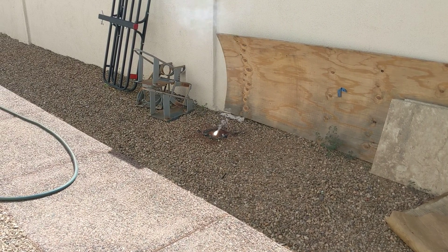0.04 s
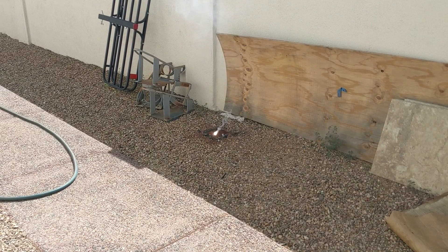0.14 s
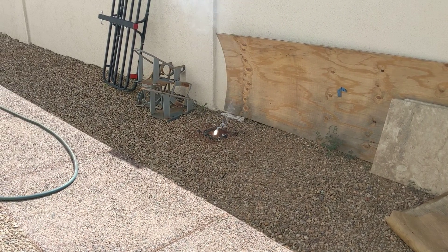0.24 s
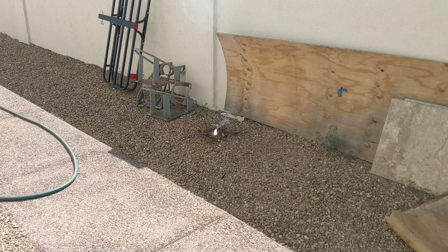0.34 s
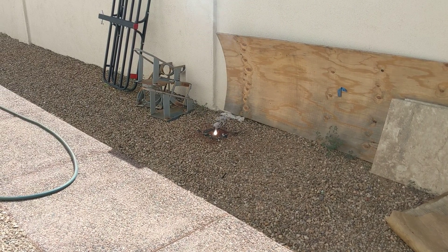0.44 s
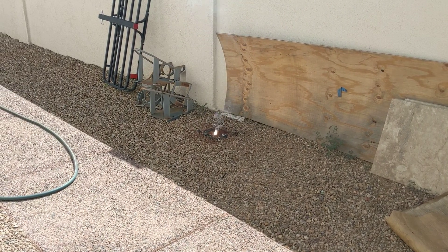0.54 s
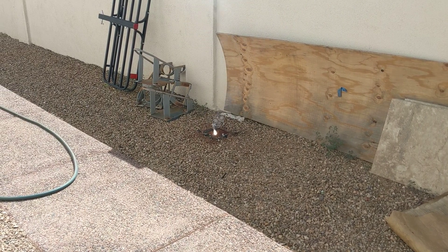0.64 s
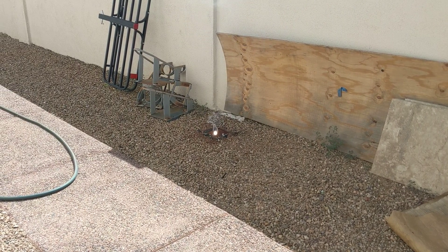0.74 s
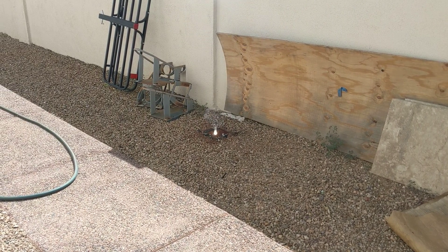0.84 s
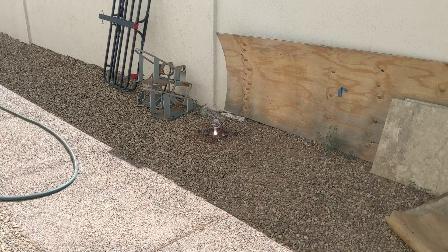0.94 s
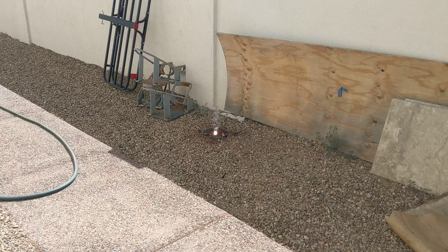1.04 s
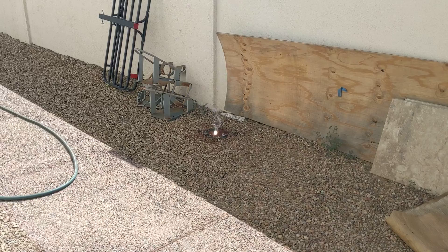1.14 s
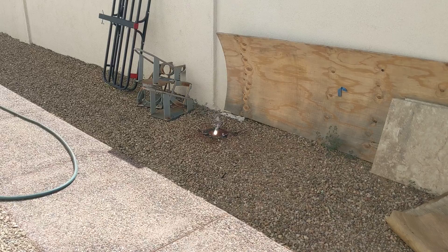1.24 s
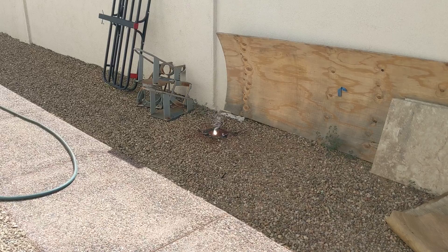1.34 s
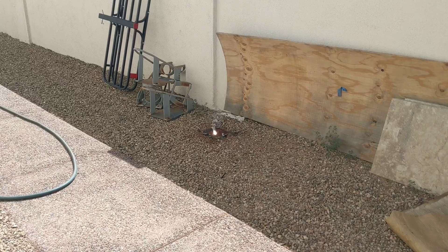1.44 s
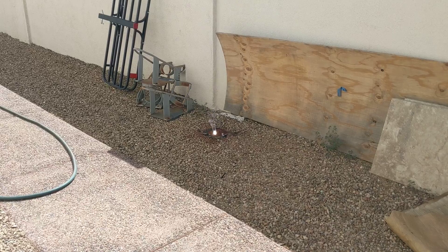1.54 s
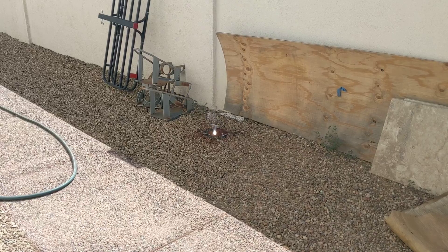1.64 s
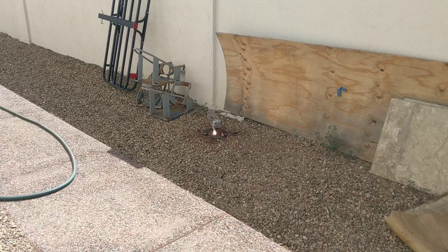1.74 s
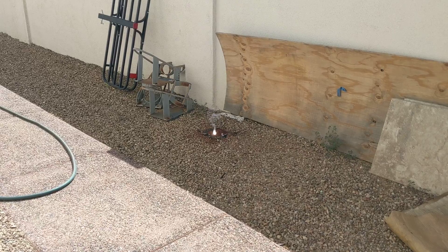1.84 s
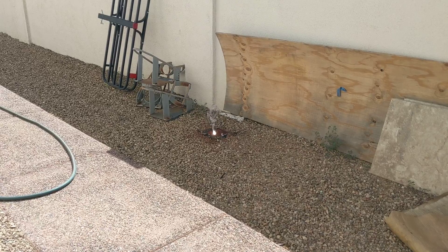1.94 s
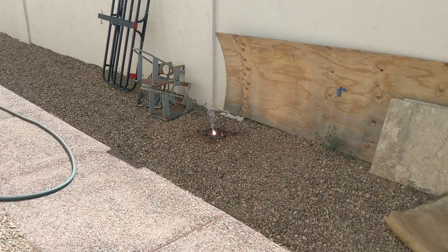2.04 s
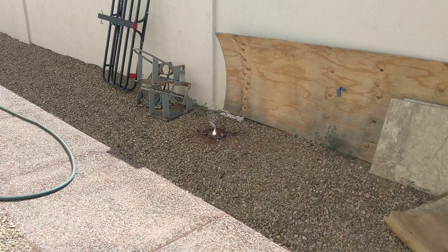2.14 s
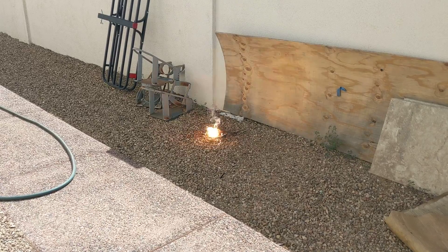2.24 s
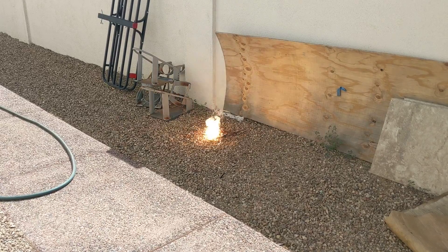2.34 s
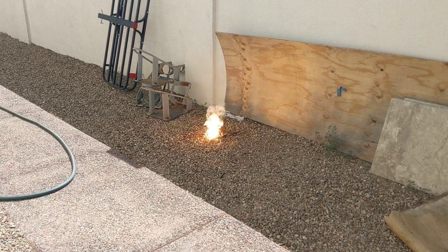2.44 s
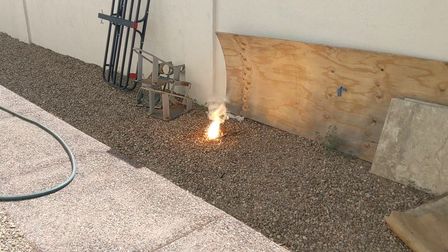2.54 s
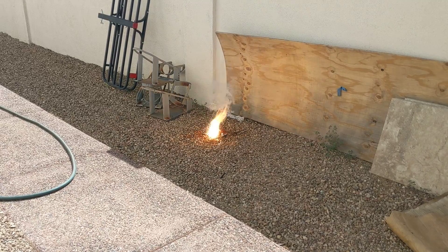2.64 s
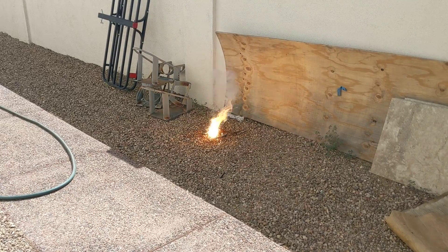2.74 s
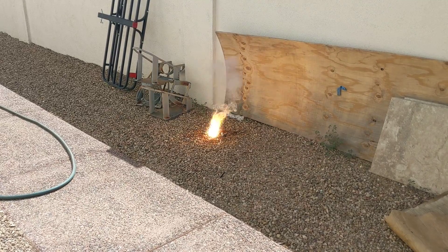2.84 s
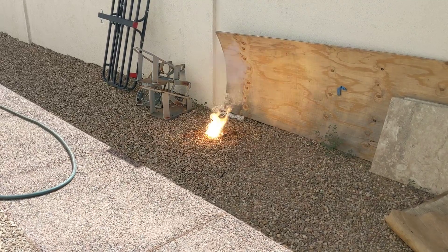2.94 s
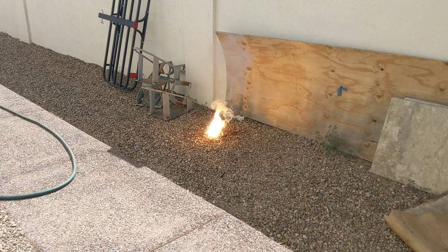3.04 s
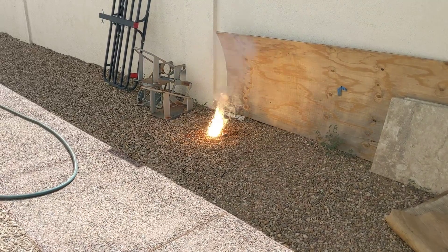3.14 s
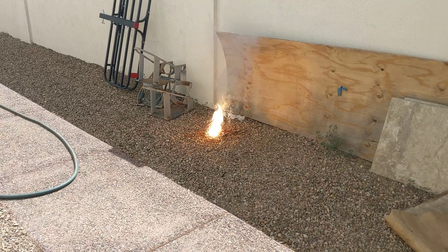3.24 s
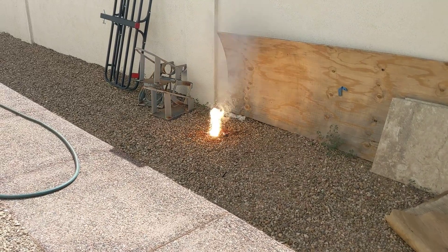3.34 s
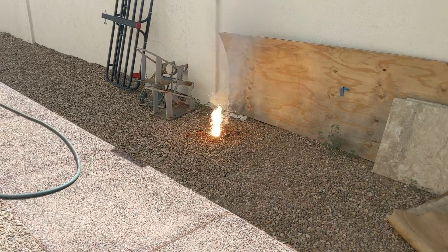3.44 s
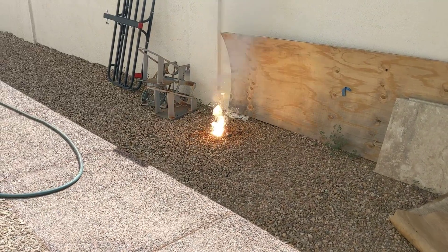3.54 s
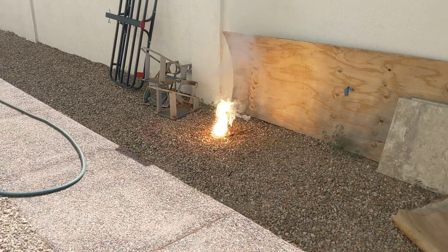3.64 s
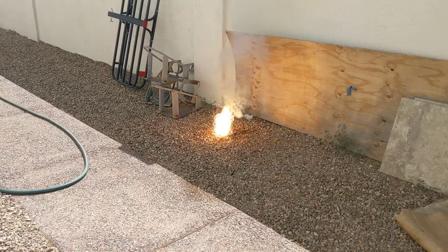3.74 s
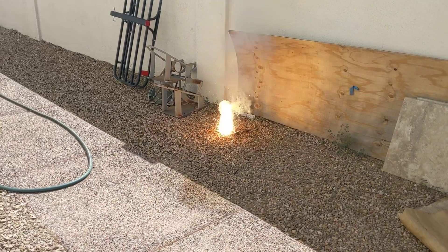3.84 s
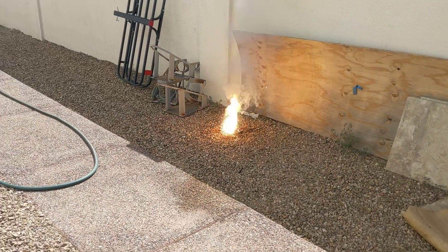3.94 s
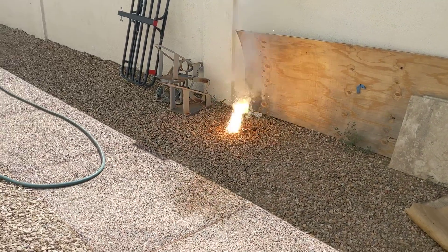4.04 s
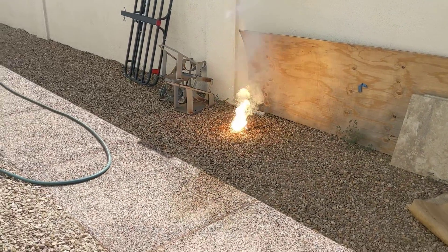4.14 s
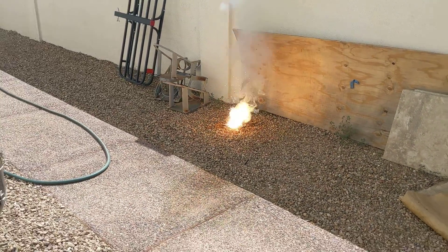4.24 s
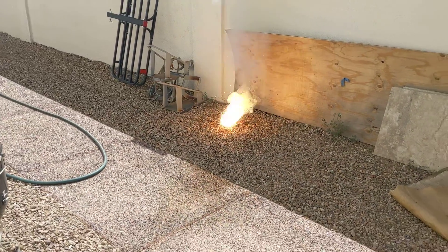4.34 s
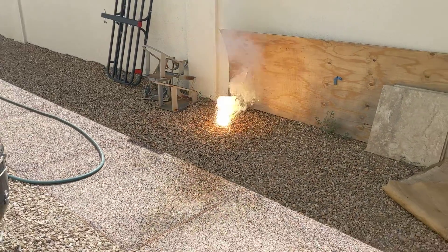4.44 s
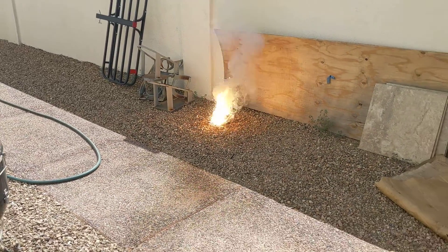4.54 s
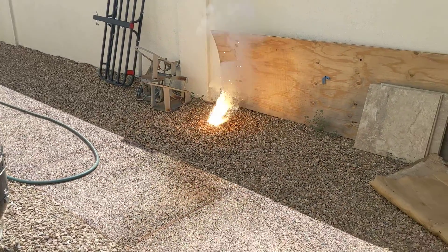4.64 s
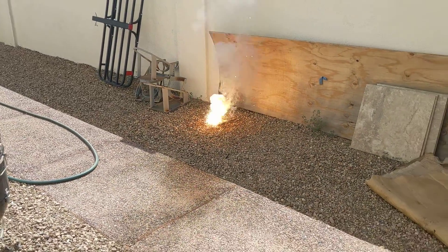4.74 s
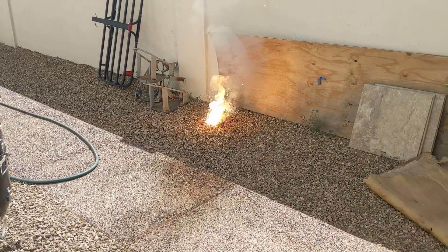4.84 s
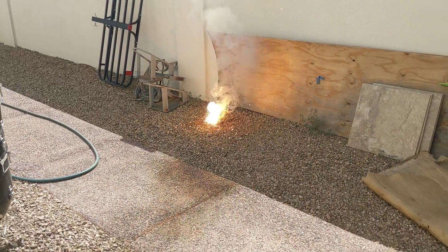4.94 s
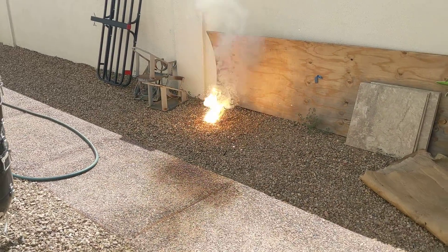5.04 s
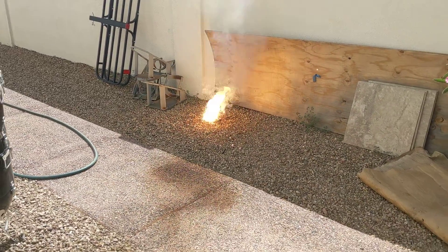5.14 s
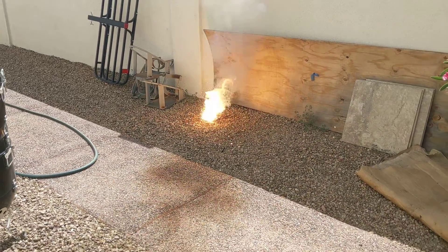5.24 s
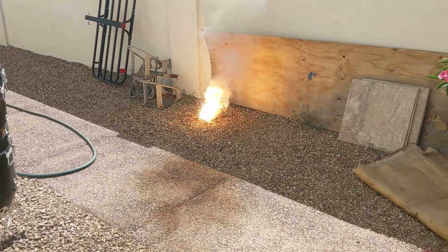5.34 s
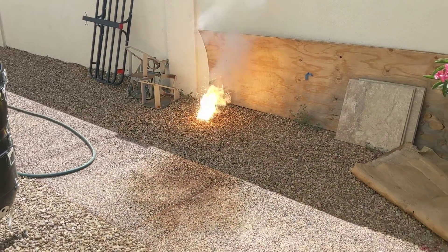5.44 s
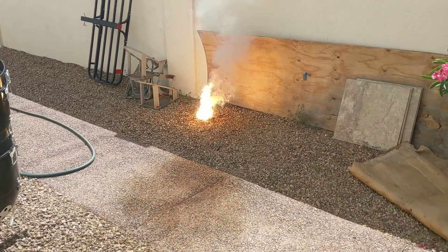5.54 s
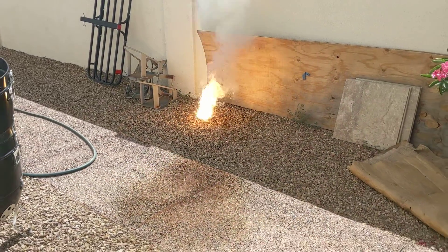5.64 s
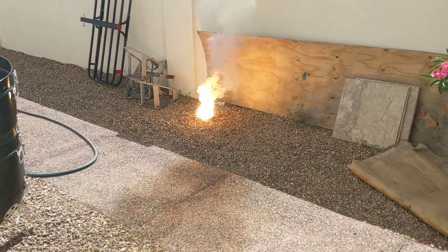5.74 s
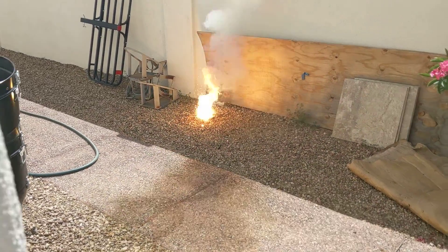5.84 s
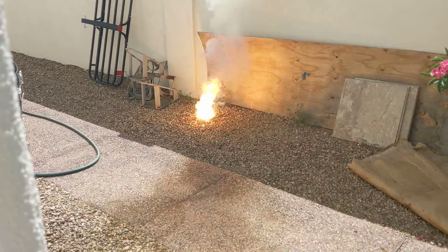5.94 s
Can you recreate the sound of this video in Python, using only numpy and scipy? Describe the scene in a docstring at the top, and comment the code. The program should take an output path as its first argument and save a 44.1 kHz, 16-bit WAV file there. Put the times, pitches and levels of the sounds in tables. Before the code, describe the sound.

A thermite charge flares up outdoors with a sudden hiss, then burns with a rushing fizz, spitting snaps and a low roar.

```python
"""A thermite charge burns on the gravel of a walled yard, a few metres from a hand-held camera.
At first there is a distant rumble, a thin steady hiss and one dull knock of the hand on the camera.
At 2.3 s the charge catches with a short, rasping flare; a jet of gas and sparks then rushes and fizzes,
coloured by echoes from walls and a plywood sheet. Molten droplets spit as the flame grows to a low roar.
From 4 s on, gas squeals through the slag, then pops softly, and the camera knocks often as it is moved."""
import sys
import numpy as np
from scipy import signal
from scipy.fft import rfft, irfft, next_fast_len
from scipy.io import wavfile
from scipy.ndimage import uniform_filter1d, map_coordinates

SR = 44100
rng = np.random.default_rng(int(sys.argv[2]) if len(sys.argv) > 2 else 0)


def dump(signal):
    """Clip the signal to [-1, 1] and save it as 16-bit WAV at the path in sys.argv[1]."""
    limited = np.clip(np.atleast_2d(signal).T, -1, 1)
    pcm = np.round(limited * 32767).astype(np.int16)
    wavfile.write(sys.argv[1], SR, pcm)


N = 263718
TIME = np.arange(N) / SR
CATCH_S, FLARE_END_S = 2.323, 2.412  # the charge catches; its first flare collapses
# state of the burn: t/s, share of crackle, share of direct sound, opening of the crater (each 0-1)
BURN = [(2.33, 0.03, 0.37, 0), (3.2, 0.06, 0.54, 0), (3.8, 0.2, 0.22, 0.56), (4.45, 0.2, 0.38, 0.55),
        (4.8, 0.24, 0.23, 0.54), (5.98, 0.3, 0.08, 0.5)]


def jet(fizz_trim_db=3.0, rush_trim_db=2.5):
    """Jet noise: streaming gas and sparks make a broadband rush with a bright fizz on top."""
    # strength of the stream: t/s, base fizz level/dB, base rush level/dB
    stream = [(2.48, -53, -52.5), (2.52, -51, -52), (2.93, -50, -51), (3.17, -45.5, -49.5),
              (3.5, -48, -50.5), (3.8, -43.5, -46), (4.27, -48, -47), (4.47, -45, -50.5),
              (4.76, -45.5, -47.5), (5.13, -46.8, -51.5), (5.68, -47, -49), (5.95, -44, -49)]
    # surges as fresh powder takes fire, and one lull: crest t/s, half length/s, lift/dB
    surges = [(2.6, 0.046, 2), (3.18, 0.057, 1), (3.98, 0.034, 1.5), (4.18, 0.059, 3.5), (4.307, 0.014, -4),
              (4.36, 0.048, 3.5), (4.43, 0.04, 2.5), (4.66, 0.028, 5.5), (5.1, 0.016, 3.5),
              (5.305, .014, 2.5), (5.412, .016, 2.5), (5.607, 0.0078, 1), (5.83, 0.046, 2.5)]
    # spectra of fizz and rush: f/Hz, relative level/dB
    fizz_spectrum = [(4500, -41), (6000, -18), (7000, -8.5), (9500, 1), (11000, -0.5), (12500, -0.5),
                     (14000, -4.5), (16000, -6)]
    rush_spectrum = [(700, -24), (1300, -3), (1900, -3), (2600, -1.5), (4000, 1.5), (4900, -1.5),
                     (5800, -2.5), (7000, -1.5), (10000, -69)]
    fizz_db, rush_db = curves(stream)
    surge_db = swells(surges)
    crackle, direct, _ = curves(BURN)
    source = blend(rng.standard_normal(N), sparks(per_second=1100, spread_db=4.0, life_s=0.0011), crackle)
    diffuse = blend(smear(source, t60=0.008), scatter(source, t60=0.035, size=8192), 0.45)
    pair = blend(diffuse, arrive(source, lead_s=0.000372), direct)
    sputter = amp(crackle * 2.1 * wobble(70))
    fizz = amp(fizz_db + fizz_trim_db + surge_db) * ignition(flare_db=8) * resonate(pair, fizz_spectrum)
    rush = amp(rush_db + rush_trim_db + surge_db) * ignition(flare_db=5) * resonate(pair, rush_spectrum)
    return sputter * (fizz + rush)


def flame(full_flame_s=4.3, full_flutter_s=3.5):
    """Combustion noise: unsteady burning makes a growing roar, a throaty blast and a low flutter."""
    # spectra of the three parts: f/Hz, relative level/dB
    roar_spectrum = [(120, -24), (250, -5), (380, 8), (600, 0.5), (720, -4), (1100, -10.5), (2000, -19)]
    blast_spectrum = [(400, -44), (690, -2), (800, -3.5), (930, -0.5), (1020, 3), (1150, -5), (1500, -3),
                      (2200, -15.5), (4000, -15.5)]
    flutter_spectrum = [(20, -4), (60, 2.5), (92, -3), (130, 2), (190, -6.5), (300, -13.5), (600, -33.5)]
    # gouts of flame: crest t/s, half length/s, lift of the blast/dB
    gouts = [(3.97, 0.1, 2.5), (4.54, 0.18, 4.5), (4.85, 0.13, 5), (5.45, 0.06, 4.5)]
    roar_db = np.interp(TIME, [CATCH_S, full_flame_s], [-65.5, -53.5])
    blast_db = np.interp(TIME, [CATCH_S, full_flame_s], [-59.5, -55]) + swells(gouts)
    flutter_db = np.interp(TIME, [CATCH_S, full_flutter_s], [-84, -59]) + 0.46 * swells(gouts)
    burning = blend(rng.standard_normal(N), sparks(per_second=200, spread_db=1.5, life_s=0.002), 0.25)
    pair = blend(rng.standard_normal((2, N)), arrive(burning, lead_s=-0.000042), 0.54)
    roar = amp(roar_db + 0.2 * wobble(43)) * resonate(pair, roar_spectrum)
    blast = amp(blast_db + 1.26 * wobble(25)) * resonate(pair, blast_spectrum)
    flutter_gain = amp(flutter_db + 3.4 * wobble(16))
    flutter = flutter_gain * noise_field(flutter_spectrum, [(60, 1.0), (130, 0.82), (300, 0.27)])
    return ignition(flare_db=9) * roar + ignition(flare_db=6) * (blast + flutter)


def spits(rise_s=0.00083, snap_t60=0.0071, sizzle_t60=0.19):
    """Impulsive sources: molten droplets burst with a snap and a sizzle, both decaying exponentially."""
    # bursting droplets: t/s, level before filtering/dB
    droplets = [(2.407, -32), (3.282, -33), (3.498, -20), (3.572, -17), (3.6063, -18.5), (3.657, -22),
                (3.675, -20), (3.848, -15.5), (4.182, -15), (4.4166, -15), (4.439, -15.5), (4.4504, -22),
                (4.481, -19), (4.517, -22), (4.651, -22), (4.9467, -17), (5.719, -18.5), (5.87, -23)]
    spectrum = [(500, -53), (3000, -5.5), (6500, -8.0), (10000, -2.5), (16000, -15)]  # f/Hz, gain/dB
    out, t = np.zeros(N + SR), np.arange(SR // 5) / SR
    snap = amp(-1 - 60 * t / snap_t60)
    sizzle = amp(-16.5 - 60 * t / sizzle_t60)
    burst = (1 - np.exp(-t / rise_s)) * (snap + sizzle)
    for s, db in droplets:
        out[round(s * SR):][:len(t)] += amp(db) * burst * rng.standard_normal(len(t))
    bright = filtered(out[:N], lambda hz: amp(along(spectrum, hz)))
    return arrive(bright, lead_s=0.000393) + amp(-4) * scatter(bright, t60=0.02)


def primer(crest_s=2.382, half_s=0.033, centre_hz=3880, width_hz=1100):
    """Deflagration: the loose powder on top goes up at once, its tiny bursts merging into a rasp."""
    swell = ignition(flare_db=0) * np.exp(-((TIME - crest_s) / half_s) ** 2)
    grains = smear(sparks(per_second=1400, spread_db=6.0, life_s=0.0015), t60=0.011)
    rasp = unit(filtered(grains, lambda hz: bell(hz - centre_hz, width_hz)))
    return amp(-46.5) * swell * rasp


def pops(thud_hz=50, thud_delay_s=0.0059):
    """Sudden expansion: gas flashes off in a dull puff or a hollow crack, then a slower rarefaction."""
    # pockets of gas: t/s, level/dB, f/Hz, ring time/cycles, relative thud level/dB
    pockets = [(4.56, -37, 920, 1.3, 1.5), (4.5771, -35, 300, 0.27, -20), (4.8425, -40, 820, 1.5, -25),
               (4.875, -35, 470, 0.6, -16), (4.877, -39, 890, 1.2, -28), (4.8794, -40, 244, 0.38, -14)]
    out = np.zeros(N)
    for s, db, hz, ring, thud_db in pockets:
        near = np.abs(TIME - s) < 0.05
        t = TIME[near] - s
        swing = np.cos(2 * np.pi * hz * t) / np.cosh(hz * t / ring)
        suction = thud(t - thud_delay_s, thud_hz)
        out[near] += amp(db) * (swing + amp(thud_db) * suction)
    return arrive(out, lead_s=-0.0002) + amp(-10) * scatter(out, t60=0.04)


def squeals(sag_hz_per_s=2160, width_hz=210):
    """Orifice tones: gas whistles hoarsely through a gap in the slag, lower as the gap widens."""
    # whistles: crest t/s, half length/s, f/Hz, level/dB
    whistles = [(4.068, 0.048, 5500, -54), (4.27, 0.011, 3040, -48), (4.36, 0.022, 3170, -44),
                (4.377, 0.079, 5520, -52), (4.425, 0.027, 3020, -55)]
    tones = np.zeros(N)
    narrow = unit(filtered(rng.standard_normal(N), lambda hz: bell(hz, width_hz)))
    for s, half_s, hz, db in whistles:
        t = TIME - s
        cycles = (hz - 0.5 * sag_hz_per_s * t) * t
        tones += amp(db) * bell(t, half_s) * np.sin(2 * np.pi * cycles)
    hoarse = tones * narrow  # modulation spreads each tone into a band
    return arrive(hoarse, lead_s=0.00036) + scatter(hoarse, t60=0.03)


def handling(ring_cycles=0.22, thud_hz=52, thud_delay_s=0.0064, left_db=1.5, right_lead_rad=2.2):
    """Structure-borne sound: damped knocks of the hand drive the two microphones well out of phase."""
    # knocks in the camera body: t/s, drive level/dB, f/Hz, relative thud level/dB
    knocks = [(1.0488, -28.5, 250, -12), (4.1152, -27.5, 290, -32), (4.119, -31.5, 230, -6),
              (4.245, -33.5, 239, -9), (4.2815, -37, 224, -16), (4.3117, -41, 274, -10),
              (4.955, -35, 360, -22), (5.0084, -44, 380, -22), (5.0316, -30, 224, -13),
              (5.1565, -33, 316, -24), (5.1889, -37, 204, -18), (5.3246, -28, 285, -24),
              (5.6743, -34, 225, -12), (5.697, -28, 305, -24), (5.8285, -35, 240, -17),
              (5.87, -24.5, 565, -28), (5.8728, -35, 480, -28), (5.9422, -36.5, 170, -14)]
    knock, sway = np.zeros(N), np.zeros(N)
    for s, db, hz, thud_db in knocks:
        near = np.abs(TIME - s) < 0.05
        t = TIME[near] - s
        knock[near] += amp(db) * np.sin(2 * np.pi * hz * t) / np.cosh(hz * t / ring_cycles)
        sway[near] += amp(db + thud_db) * thud(t - thud_delay_s, thud_hz)
    right = filtered(knock, lambda hz: np.exp(1j * right_lead_rad))
    return np.array([amp(left_db) * knock, amp(-left_db) * right]) + sway


def yard():
    """Ambient noise: a distant rumble, coherent at long wavelengths, and a thin, incoherent hiss."""
    # spectra of rumble and hiss: f/Hz, relative level/dB
    rumble_spectrum = [(15, -1), (35, 0.5), (80, -6), (120, -7.5), (140, -11.5), (300, -15.5), (600, -16),
                       (950, -16), (1200, -23), (1900, -32.5), (4500, -34), (16000, -67)]
    hiss_spectrum = [(4000, -54), (5100, -22.5), (5800, -11), (6500, -10), (7600, -5), (9500, 1),
                     (10800, -9.5), (11800, -7.5), (13000, -23.5), (16000, -32)]
    # likeness of the rumble at the two microphones: f/Hz, correlation
    coherence = [(60, 0.95), (130, 0.94), (290, 0.48), (640, 0.19), (1410, 0.39), (3100, 0.13),
                 (6820, -0.64), (15000, 0.15)]
    rumble = amp(-56 + 0.67 * wobble(7.28)) * noise_field(rumble_spectrum, coherence)
    hiss = amp(-56) * noise_field(hiss_spectrum, [(5000, 0.02)])
    return rumble + hiss


def ignition(flare_db, rise_s=0.017, fall_s=0.027):
    """Onset transient: silence, a quick rise into the flare, then the steady burn at gain 1."""
    flare = np.clip(1 - (TIME - FLARE_END_S) / fall_s, 0, 1)
    return np.clip((TIME - CATCH_S) / rise_s, 0, 1) * amp(flare_db * flare)


def sparks(per_second, spread_db, life_s):
    """Shot noise: tiny bursts come at random; most are weak, a few stand out."""
    sizes = amp(spread_db * np.minimum(rng.standard_exponential(N), 5))
    energy = (rng.random(N) < per_second / SR) * sizes ** 2
    keep = np.exp(-1 / (life_s * SR))
    return unit(np.sqrt(signal.lfilter([1], [1, -keep], energy)) * rng.standard_normal(N))


def thud(t, hz):
    """Rarefaction pulse: one slow dip in pressure, centred on t = 0."""
    v = 2 * np.pi * hz * t
    return (v ** 2 - 1) * np.exp(-v ** 2 / 2)


def resonate(x, spectrum, wander=0.0043, waver_db=1.2):
    """Resonance of walls and crater: bands sway with the flame and change gain as the crater opens."""
    # bands: f/Hz, width/Hz, gain at opening 0/dB, gain at opening 1/dB
    bands = [(376, 58, 0.5, 4.5), (452, 56, 3.5, -0.5), (937, 54, 1.5, 10), (1564, 25, 8, 6),
             (1840, 110, -6, 5), (2090, 39, 7.5, -3.5), (2394, 66, 8, -2.5), (3300, 150, 2.3, 4.5),
             (4150, 180, 1, 1.5), (5490, 270, 5.5, 6), (6500, 190, -0.5, -1.5), (7630, 270, 2.5, 7),
             (9500, 720, 4.5, 6), (11710, 270, 8, 5.5)]
    hz, t, frames = signal.stft(filtered(x, walls), SR, nperseg=1024)
    opening = np.interp(t, TIME, curves(BURN)[2])
    hz = hz[:, None]
    colour_db = along(spectrum, hz)
    for centre, width, closed_db, open_db in bands:
        stray, waver = unit(uniform_filter1d(rng.standard_normal((2, len(t))), size=14))
        band_db = closed_db + (open_db - closed_db) * opening + waver_db * waver
        colour_db = colour_db + band_db * bell(hz - centre * (1 + wander * stray), width)
    gain = amp(colour_db)
    _, coloured = signal.istft(frames * gain / np.linalg.norm(gain, axis=0), nperseg=1024)
    return unit(coloured[:, :N])


def walls(hz):
    """Comb filtering: echoes interfere with the direct sound; rough surfaces mirror less treble."""
    # echoes of ground, plywood and wall: delay/s, low-frequency gain
    echoes = [(.0037, .13), (.0079, .17), (.0135, .19), (.023, .17)]
    mirrored = 1 / np.hypot(1, hz / 8000)
    return 1 + mirrored * sum(gain * np.exp(-2j * np.pi * hz * delay) for delay, gain in echoes)


def scatter(x, t60, size=4096):
    """Scattering by gravel and clutter: the paths to each microphone change as the flame sways."""
    t = np.arange(size) / SR
    padded, out = np.pad(x, (size, 2 * size)), np.zeros((2, N + 10 * size))
    fade = np.sin(np.linspace(0, np.pi, 2 * size))
    for start in range(0, N + size, size):
        tail = rng.standard_normal((2, size)) * amp(-60 * t / t60)
        tail /= np.linalg.norm(tail, axis=1, keepdims=True)
        piece = fade * padded[start:start + 2 * size]
        smeared = signal.fftconvolve(piece[None], tail, axes=1)
        out[:, start:start + smeared.shape[1]] += smeared
    return out[:, size:size + N]


def smear(x, t60):
    """Diffuse field: a wash at each microphone follows the energy of x and dies away behind it."""
    keep = amp(-60 / (t60 * SR)) ** 2
    return np.sqrt(signal.lfilter([1 - keep], [1, -keep], x ** 2)) * rng.standard_normal((2, N))


def arrive(x, lead_s):
    """Path difference: a sound reaches the left microphone lead_s before the right."""
    return filtered(x, lambda hz: np.exp(1j * np.pi * hz * lead_s * np.array([[1], [-1]])))


def noise_field(spectrum, coherence):
    """Partial coherence: stereo noise of rms 1 from (f/Hz, level/dB) and (f/Hz, correlation) points."""
    def mid_and_side(hz):
        turn = np.arccos(np.clip(along(coherence, hz), -1, 1)) / 2
        return amp(along(spectrum, hz)) * [np.cos(turn), np.sin(turn)]
    mid, side = filtered(rng.standard_normal((2, N)), mid_and_side)
    return unit(np.array([mid + side, mid - side]))


def amp(db):
    """Decibels to amplitude ratio."""
    return 10 ** (np.asarray(db) / 20)


def unit(x):
    """Normalisation to rms 1."""
    return x / np.sqrt(np.mean(x ** 2) + 1e-20)


def bell(offset, width):
    """Gaussian of height 1."""
    return np.exp(-0.5 * (offset / width) ** 2)


def swells(rows):
    """Lift in dB from a sum of Gaussian swells."""
    return sum(db * np.exp(-((TIME - s) / half_s) ** 2) for s, half_s, db in rows)


def along(points, hz):
    """Interpolation of (f/Hz, value) points on a logarithmic frequency axis."""
    f, v = np.transpose(points)
    return np.interp(np.log(hz + 1), np.log(f + 1), v)


def curves(rows):
    """Interpolation in time: one value per sample for each column after t/s."""
    s, *cols = np.transpose(rows)
    return [np.interp(TIME, s, c) for c in cols]


def wobble(rate):
    """Random modulation: a smooth curve with rate knots a second."""
    return map_coordinates(rng.standard_normal(int(N * rate / SR) + 4), [TIME * rate])


def filtered(x, response):
    """Linear filtering: the spectrum of x times a complex frequency response."""
    m = next_fast_len(N + SR // 4)
    return irfft(rfft(x, m) * response(np.fft.rfftfreq(m, 1 / SR)), m)[..., :N]


def blend(a, b, share):
    """Incoherent addition: an equal-power mix with the given share of b."""
    return np.sqrt(1 - share) * a + np.sqrt(share) * b


def scene():
    """Superposition of the burning charge, its yard and the camera in the hand."""
    return primer() + jet() + spits() + squeals() + flame() + pops() + yard() + handling()


def record(dry, top_hz=15850):
    """Frequency response: the left microphone is the brighter; nothing passes above the band limit."""
    # imbalance of the microphones: f/Hz, left minus right level/dB
    imbalance = [(30, 2.3), (120, 0.5), (400, 2.5), (900, 2), (1500, 0.5), (5500, -0.5), (6800, 3.5),
                 (7700, 6.5), (9500, 6.5), (10700, 12), (11800, 17.5), (13500, 3.5), (16000, 13)]
    def ports(hz):
        left_over_right = amp(along(imbalance, hz))
        gains = np.array([left_over_right, np.ones_like(hz)]) * np.sqrt(2) / np.hypot(1, left_over_right)
        return gains * (hz < top_hz)
    return filtered(dry, ports)


dry = scene()
out = record(dry)
dump(out)
```